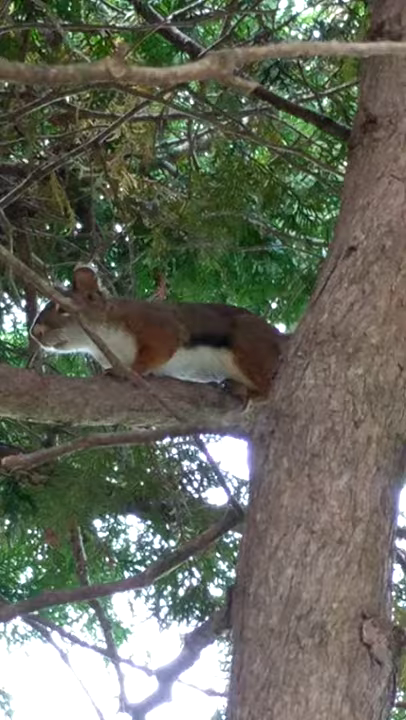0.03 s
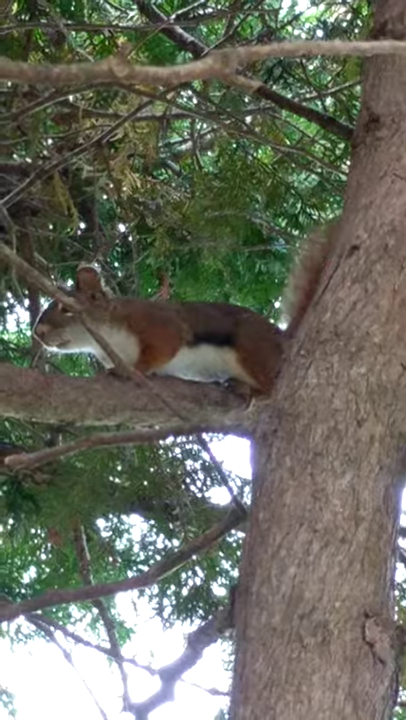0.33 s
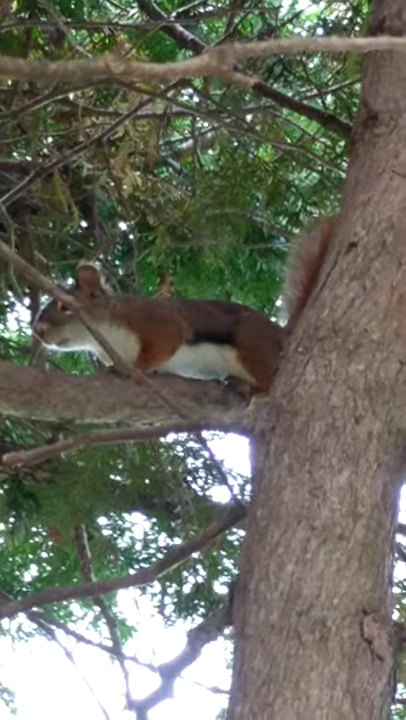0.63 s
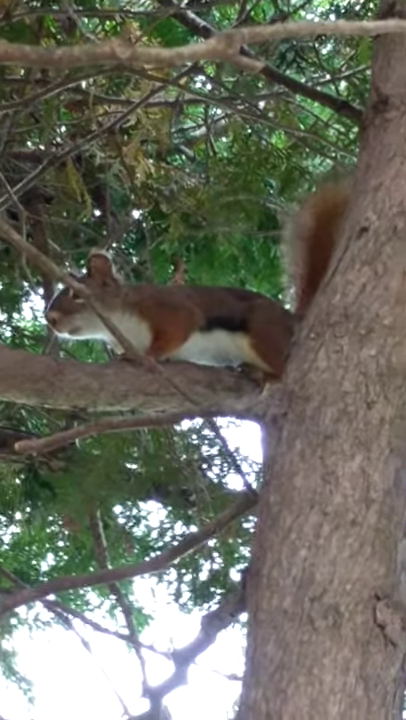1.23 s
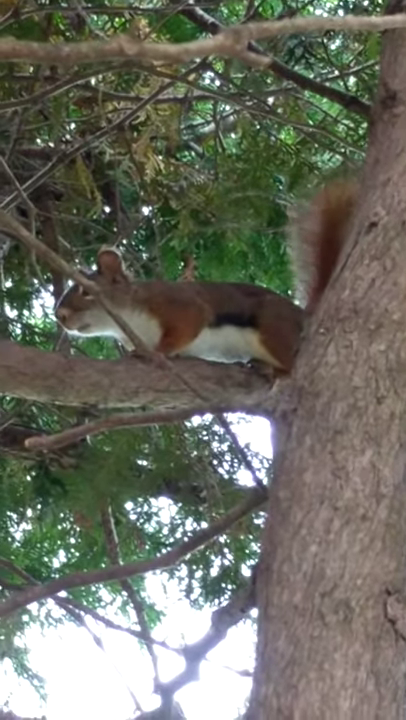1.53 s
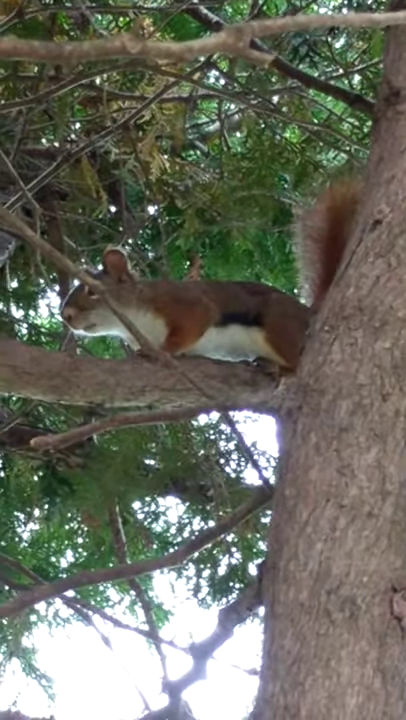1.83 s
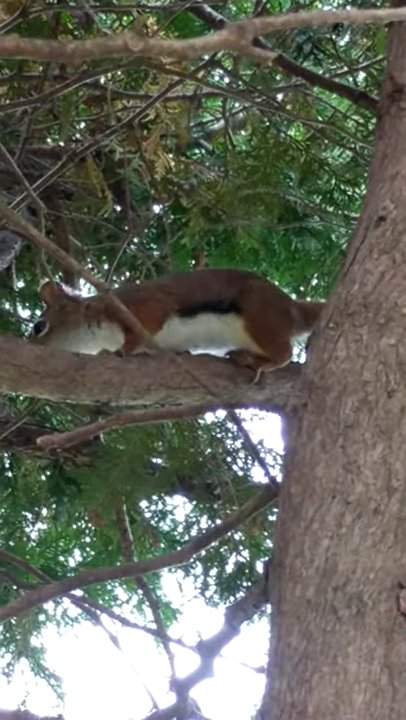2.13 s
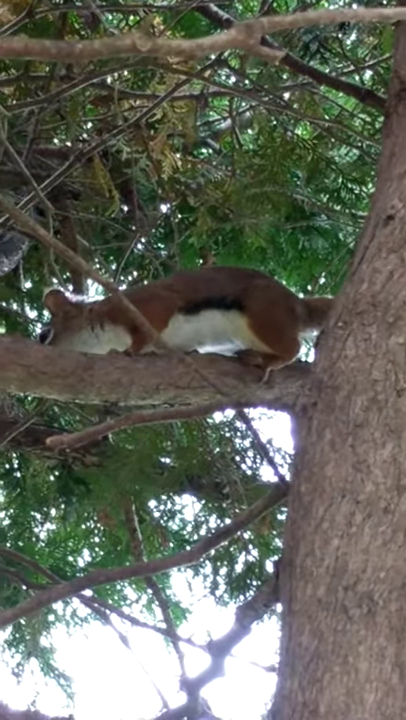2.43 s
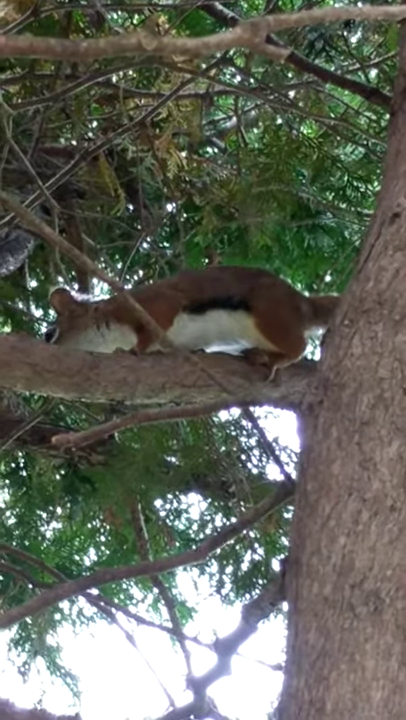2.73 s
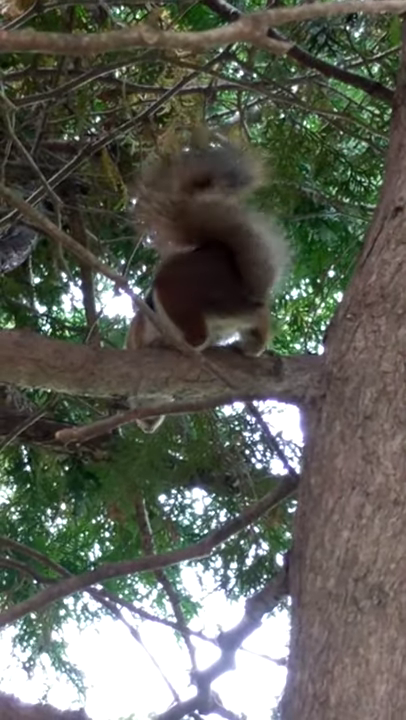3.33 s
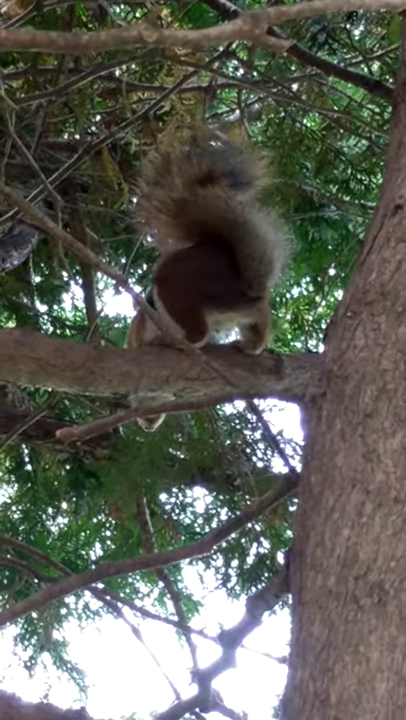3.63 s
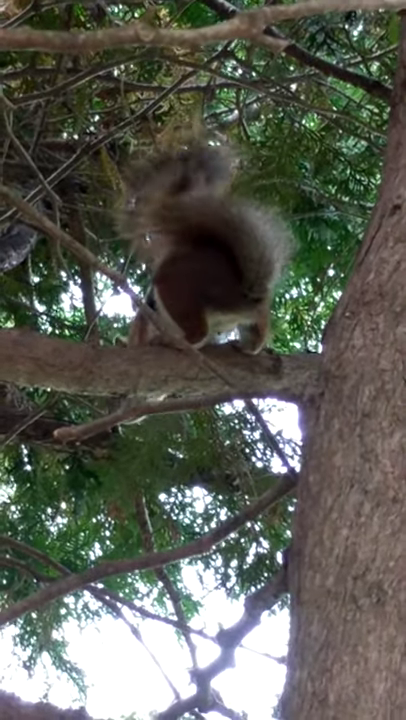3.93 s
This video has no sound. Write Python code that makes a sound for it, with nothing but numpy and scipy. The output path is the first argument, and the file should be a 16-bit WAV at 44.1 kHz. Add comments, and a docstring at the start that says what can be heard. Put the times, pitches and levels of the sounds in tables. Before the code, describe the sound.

A red squirrel close to the microphone gives short, shrill chips at uneven intervals, with two hoarse little barks in the second half. Behind it are a soft forest hiss, a distant engine and very faint birds.

```python
"""A soft outdoor hiss fades in under conifers; far off an engine pulls through its gears.
Close to the microphone a red squirrel on a branch gives nine shrill chips, arched whistles that turn
rough in the middle, and two hoarse barks, pulses of air ringing in its mouth. The trees return a short
ring. In the distance a small bird peeps, among thin whistles and a soft two-part hoot."""
import sys
import numpy as np
from scipy import signal
from scipy.fft import rfft, irfft
from scipy.io import wavfile

SR = 44100
rng = np.random.default_rng(int(sys.argv[2]) if len(sys.argv) > 2 else 0)


def wav_out(sig):
    """Save sig, one row per channel (or a flat mono array), as 16-bit PCM at SR to the path in sys.argv[1]."""
    wavfile.write(sys.argv[1], SR, np.round(np.clip(np.atleast_2d(sig).T, -1, 1) * 32767).astype(np.int16))


N = 176400
TIME = np.arange(N) / SR


def from_db(db):
    """Decibels to gain."""
    return 10 ** (np.asarray(db) / 20)


def rms_one(x):
    """Scale to rms 1."""
    return x / np.sqrt(np.mean(x ** 2) + 1e-20)


def in_time(rows):
    """Each column of a curve, at every sample."""
    time_s, *columns = np.transpose(rows)
    return [np.interp(TIME, time_s, column) for column in columns]


def noise(gain_at):
    """Noise of rms 1 whose colour is a function of frequency."""
    hz = np.arange(N // 2 + 1) * SR / N
    return rms_one(irfft(rfft(rng.standard_normal(N)) * gain_at(hz), N))


def coloured(points):
    """Noise with a spectrum of (Hz, dB) points, falling steeply outside them."""
    hz, db = np.transpose(points)
    log_hz = np.log(np.r_[hz[0] / 2, hz, hz[-1] * 1.2])
    db = np.r_[db[0] - 40, db, db[-1] - 60]
    return noise(lambda f: from_db(np.interp(np.log(f + 1), log_hz, db)))


def resonant(hz, width_hz):
    """Noise twice through one resonance."""
    return noise(lambda f: 1 / (1 + ((f - hz) / width_hz * 2) ** 2))


def drift(rate_hz):
    """Random wander of rms 1, mostly slower than rate_hz."""
    return noise(lambda f: 1 / (1 + (f / rate_hz) ** 2))


def tone(phase):
    """Sine of rms 1."""
    return np.sqrt(2) * np.sin(phase)


def phase_of(hz):
    """Running phase of a pitch curve."""
    return 2 * np.pi * np.cumsum(hz) / SR


def note(start_s, length_s, attack_s, release_s):
    """Sample indices i, progress u (0-1) and envelope of one call."""
    i = np.arange(int(start_s * SR), min(int((start_s + length_s) * SR), N))
    u = np.linspace(0, 1, len(i))
    return i, u, np.minimum(1, u * length_s / attack_s) * np.minimum(1, (1 - u) * length_s / release_s)


def outdoor_air():
    """All around: a soft rush, a flickering high hiss and a faint, very high pulsing."""
    # Spectra of the rush and the hiss: frequency_hz, level_db
    rush_spectrum = [(60, 0.5), (130, -3.5), (190, -6), (280, -12), (400, -11), (560, -15.5), (850, -13.5),
                     (1300, -18), (2200, -26.5), (3200, -29.5), (4200, -31.5), (5600, -31), (7200, -39)]
    hiss_spectrum = [(7000, -15), (7900, -12), (8500, -2.5), (9400, 2.5), (10800, -1.5), (11900, -0.5),
                     (13400, -7), (15000, -7), (16800, -12.5), (18000, -18)]
    # Their loudness over time: time_s, level_db
    rush_level = [(0, -51), (.3, -49), (.7, -46), (1.3, -47.5), (2.0, -47), (2.6, -47), (3.3, -47),
                  (4, -48.5)]
    hiss_level = [(0, -63.5), (.35, -53.5), (1.0, -56), (2.0, -56.5), (2.8, -53.5), (3.2, -57.5),
                  (3.65, -55), (3.8, -76), (4, -69)]
    hiss_db, pulses_per_s = in_time(hiss_level)[0], 7.1
    rush = from_db(in_time(rush_level)[0]) * coloured(rush_spectrum)
    hiss = from_db(hiss_db + 2.9 * drift(36)) * coloured(hiss_spectrum)
    pulsing = np.cos(np.pi * pulses_per_s * TIME) ** 2
    trill = from_db(hiss_db - 9) * pulsing * resonant(hz=15230, width_hz=160)
    return rush + hiss + trill


def far_traffic():
    """Three low orders of a distant engine changing gear, over a wavering traffic drone."""
    # Engine firing rate: time_s, rate_hz
    firing_rate = [(0, 59.5), (.4, 62.1), (.65, 66.53), (1.0, 77.05), (1.3, 80.9), (1.52, 83.8),
                   (1.72, 73.06), (1.9, 64.3), (2.25, 69.24), (2.75, 75.7), (3.15, 78.5), (3.4, 71),
                   (3.85, 59.8), (4, 59)]
    # Engine loudness before each order's trim: time_s, firing_tone_db, overtones_db
    engine_level = [(0, -54, -60), (.25, -55, -71), (.38, -37.5, -50), (.6, -39.5, -46), (.9, -40.5, -61),
                    (1.05, -37.5, -57), (1.3, -37, -62.5), (1.55, -40.5, -56.5), (1.9, -37, -51.5),
                    (2.3, -36.5, -46), (2.7, -32, -51.5), (3.05, -40, -54.5), (3.3, -46.5, -49.5),
                    (3.5, -64, -52), (3.7, -42.5, -55.5), (4, -41, -52.5)]
    # Loudness of the drone: time_s, level_db
    drone_level = [(0, -58), (.4, -56), (.75, -41), (1.0, -50), (1.25, -36), (1.5, -49), (1.73, -34.5),
                   (1.95, -51), (3.3, -59), (3.7, -47), (4, -44)]
    phase = phase_of(in_time(firing_rate)[0])
    firing_db, overtones_db = in_time(engine_level)
    orders_db, waver_db = [firing_db - 2.5, overtones_db - 2, overtones_db - 7.5], 2
    engine = sum(from_db(db + waver_db * drift(7.7)) * tone(order * phase)
                 for order, db in enumerate(orders_db, 1))
    return engine + from_db(in_time(drone_level)[0]) * resonant(hz=63, width_hz=12.3)


def far_whistles():
    """Long, thin whistles in the distance, probably birds."""
    # Whistles: start_s, length_s, pitch_hz, level_db
    whistles = [(.15, 0.51, 2910, -66), (.62, 1.21, 3017, -69), (1.834, 0.311, 3550, -68)]
    out = np.zeros(N)
    for start_s, length_s, hz, db in whistles:
        i, u, envelope = note(start_s, length_s, attack_s=0.048, release_s=0.13)
        out[i] += from_db(db) * envelope * resonant(hz, width_hz=42)[i]
    return out


def squirrel_chips():
    """A close whistle flicks in, arches and drops; midway it wobbles, rasps and gains an undertone."""
    # Chips: start_s, length_s, start_hz, top_hz, end_hz, top_fraction, drop_exponent, level_db,
    # octave_db, rasp_db, undertone_db, midway_tone_loss_db, downslope_push_db
    chips = [(.274, .042, 4950, 5290, 4600, .42, 2.14, -25, -12, -12, -21.5, 0, 0),
             (1.090, 0.042, 4890, 5265, 4500, 0.29, 2.16, -23, -14, -11.5, -25, 1, -1),
             (1.331, 0.03, 4706, 5120, 4650, 0.59, 1.93, -20, -15, -18, -29, 1, -2),
             (1.502, 0.025, 4790, 4940, 4600, 0.68, 1.7, -21.5, -15.5, -17.5, -32, 1, -4),
             (2.069, 0.079, 5150, 5950, 4570, 0.57, 2.26, -24.5, -14, -11, -9, 17.5, 8),
             (2.910, 0.063, 4970, 5830, 4680, 0.55, 1.81, -24, -12.5, -10.5, -13, 8.5, 4.5),
             (3.253, .054, 5363, 5664, 4943, 0.37, 1.24, -26, -5, -10.5, -20.5, 6, 7.5),
             (3.757, .031, 5112, 5200, 4885, .25, 1.64, -27.5, -5, -10, -21, 1.5, 1.5),
             (3.892, 0.035, 4950, 5070, 4826, .45, 2.8, -28, -12.5, -7.5, -26, 1.5, -1.5)]
    # Spectrum of the rasp: frequency_hz, level_db
    rasp_spectrum = [(1500, -48), (2200, -11), (2600, -6.5), (3300, 0.5), (3900, -1.5), (4600, 3),
                     (5600, 11), (6400, -65), (7000, -13), (7900, -7), (9000, -11.5), (10500, 3.5),
                     (11700, -9.5), (13000, -22), (14600, -20), (16300, -10), (17500, -25)]
    flick_s, jitter, swell_db, beat_hz = 0.013, 0.0244, 5.5, 330.5
    out, rasp, wobble, flutter = np.zeros(N), coloured(rasp_spectrum), drift(402), drift(201)
    for (start_s, length_s, start_hz, top_hz, end_hz, top_at, drop_power,
         db, octave_db, rasp_db, undertone_db, loss_db, push_db) in chips:
        # A soft upward flick leads in.
        i, u, envelope = note(start_s - flick_s / 2, flick_s, flick_s / 2, flick_s / 2)
        out[i] += from_db(db - 27) * envelope * tone(phase_of(4550 + 350 * u))

        i, u, envelope = note(start_s, length_s, attack_s=0.0049, release_s=0.0076)
        rise_left = np.maximum(1 - u / top_at, 0)
        fall = np.maximum((u - top_at) / (1 - top_at), 0)
        hz = top_hz + (start_hz - top_hz) * rise_left ** 1.7 + (end_hz - top_hz) * fall ** drop_power
        strain = np.sin(np.pi * u) ** 2
        phase = phase_of(hz * (1 + jitter * strain * wobble[i]))

        late_push_db = push_db * np.exp(-((u - 0.82) / 0.1) ** 2)
        arch_db = -swell_db * np.cos(np.pi * u ** 0.92) ** 2 - 2.5 * rise_left
        whistle = from_db(arch_db + late_push_db) * tone(phase)
        # A second voice just below the whistle beats with it.
        second_voice = from_db(-13) * strain * tone(phase_of(hz - beat_hz * (1 + 0.3 * flutter[i])))
        octave = from_db(octave_db - 5.5 * (u + strain / 2)) * tone(2 * phase)
        third_harmonic = from_db(-29) * (1 - rise_left) * (1 - fall) * tone(3 * phase)
        midway_gain = from_db(strain * (np.tanh(flutter[i]) - loss_db))
        clear = midway_gain * (whistle + second_voice + octave + third_harmonic)

        sinking_hz = (3222 - 365 * u) * (1 + 0.046 * flutter[i])
        broken_voice = tone(phase_of(sinking_hz)) + from_db(-16.5) * tone(1.5 * phase)
        rough = from_db(rasp_db) * rasp[i] + from_db(undertone_db) * broken_voice
        out[i] += from_db(db) * envelope * (clear + strain ** 0.59 * rough)
    return out


def far_hoot():
    """A soft, distant call whose pitch creeps up through its two parts."""
    # Parts of the call: start_s, length_s, level_db
    parts = [(.615, .11, -45), (.70, .13, -50)]
    first_s, start_hz, rise_hz_per_s = parts[0][0], 855, 90
    out, waver = np.zeros(N), drift(60)
    for start_s, length_s, db in parts:
        i, u, envelope = note(start_s, length_s, attack_s=0.04, release_s=0.076)
        hz = start_hz + rise_hz_per_s * (TIME[i] - first_s) + 4 * waver[i]
        out[i] += from_db(db) * envelope * tone(phase_of(hz))
    return out


def far_peeps():
    """A small bird far off gives thin, falling peeps."""
    # Peeps: start_s, level_db
    peeps = [(.815, -62), (.875, -60), (.938, -58), (1.018, -60), (2.405, -58), (2.465, -56)]
    start_hz, fall_hz = 4570, 295
    out, waver = np.zeros(N), drift(60)
    for start_s, db in peeps:
        i, u, envelope = note(start_s, length_s=0.029, attack_s=0.0075, release_s=0.0097)
        hz = (start_hz - fall_hz * u) * (1 + 0.012 * waver[i])
        out[i] += from_db(db) * envelope * tone(phase_of(hz))
    return out


def squirrel_barks():
    """Uneven pulses of air excite the mouth's resonances, with a broken squeal inside."""
    # Barks: start_s, length_s, level_db, squeal_db
    barks = [(2.319, 0.024, -32, -4), (3.498, 0.046, -26, -19)]
    # Resonances of the open mouth: centre_hz, width_hz, level_db
    mouth = [(1106, 600, -9.5), (3230, 1090, -0.5), (5378, 980, 0.5), (8500, 1600, -3.5), (10960, 600, 3.5),
             (13200, 800, -11), (16300, 800, -4.5)]
    pulses_per_s, pulse_depth_db, squeal_hz = 160.3, 4, 5180
    out, uneven = np.zeros(N), drift(310)
    breath = rms_one(sum(from_db(db) * resonant(hz, width_hz) for hz, width_hz, db in mouth))
    for start_s, length_s, db, squeal_db in barks:
        i, u, envelope = note(start_s, length_s, attack_s=0.0046, release_s=0.0061)
        pulse_phase = phase_of(pulses_per_s * (1 + 0.26 * uneven[i]))
        pulses = rms_one(from_db(pulse_depth_db * np.cos(pulse_phase)))
        squeal = from_db(squeal_db) * tone(phase_of(squeal_hz * (1 + 0.0394 * uneven[i])))
        out[i] += from_db(db) * envelope * pulses * (breath[i] + squeal)
    return out


def forest_echo(sound, t60_s, cutoff_hz):
    """Scatter from trunks and twigs: a dense dying tail with dulled treble."""
    t = TIME[:SR]
    tail = rng.standard_normal(SR) * from_db(-60 * t / t60_s) * (1 - np.exp(-t / 0.012))
    tail /= np.sqrt(np.sum(tail ** 2))
    lowpass = signal.butter(2, cutoff_hz, fs=SR, output="sos")
    return signal.fftconvolve(sound, signal.sosfilt(lowpass, tail))[:N]


def scene():
    """At one microphone: the calls and their near and far echoes, over traffic and outdoor air."""
    # More far echo once the squirrel faces the trees: time_s, gain_db
    facing_trees = [(0, 0), (3.0, -0.5), (3.5, 3.5), (3.75, 4), (4, 2)]
    calls = squirrel_chips() + squirrel_barks() + far_whistles() + far_hoot() + far_peeps()
    into_trees = calls * from_db(in_time(facing_trees)[0])
    far_echo = from_db(-19.5) * forest_echo(into_trees, t60_s=0.42, cutoff_hz=5900)
    near_echo = from_db(-12) * forest_echo(calls, t60_s=0.061, cutoff_hz=13500)
    return (calls + far_echo + near_echo + far_traffic() + outdoor_air())[None]


def record(dry):
    """The sound fades in and the highest treble is cut."""
    # Fade-in: time_s, gain_db
    fade_in = [(.07, -47), (.09, -17.5), (.18, -6.5), (.33, 1)]
    cutoff_hz = 17000
    lowpass = signal.ellip(10, 0.3, 70, cutoff_hz, fs=SR, output="sos")
    return signal.sosfilt(lowpass, dry * from_db(in_time(fade_in)[0]))


dry = scene()
out = record(dry)
wav_out(out)
```